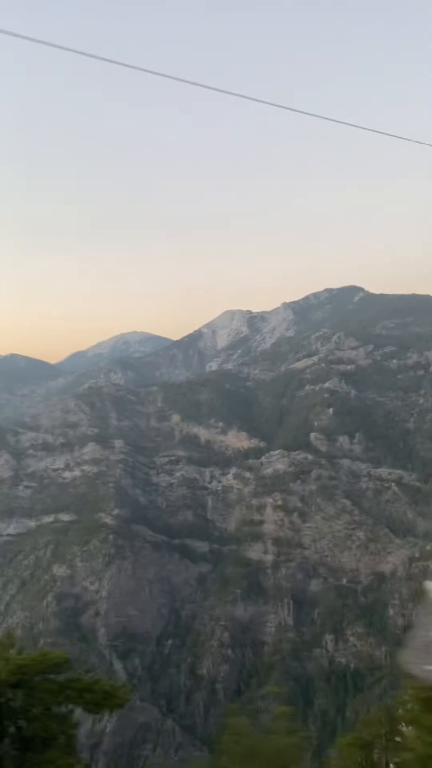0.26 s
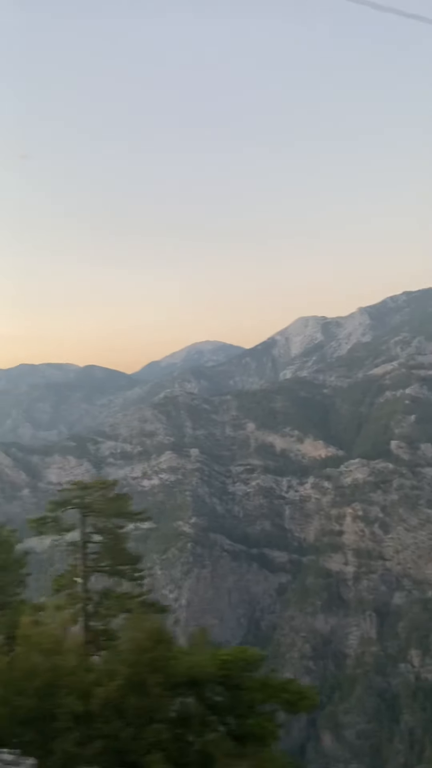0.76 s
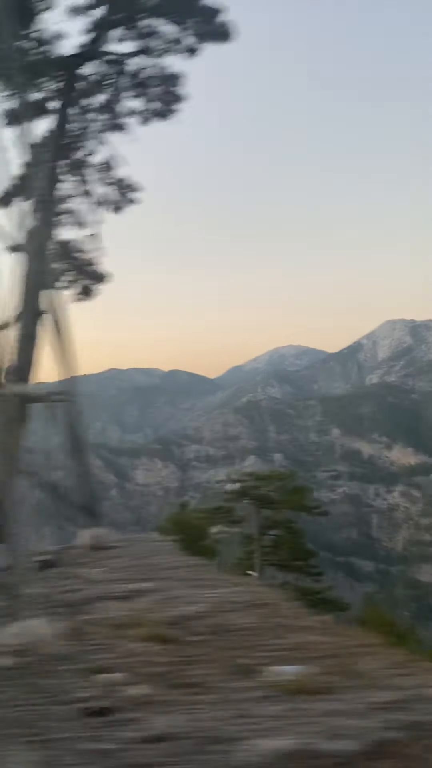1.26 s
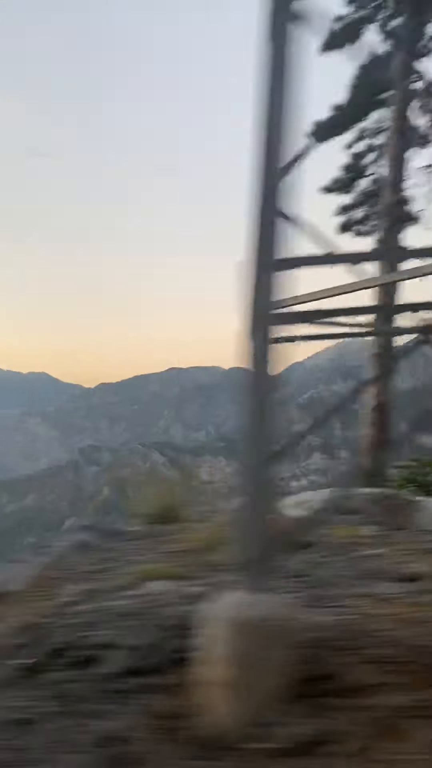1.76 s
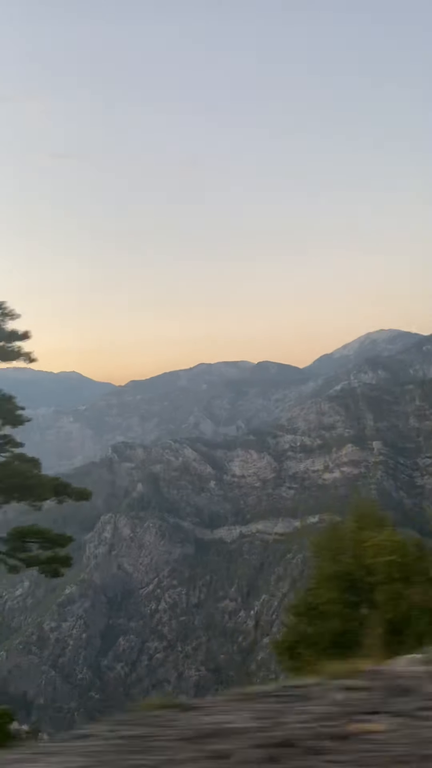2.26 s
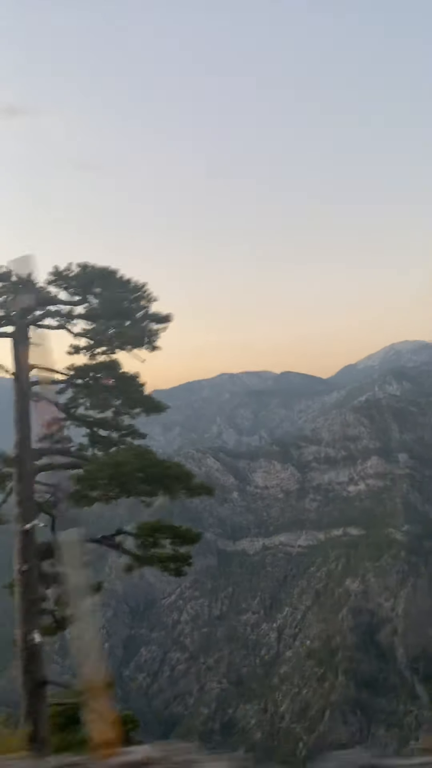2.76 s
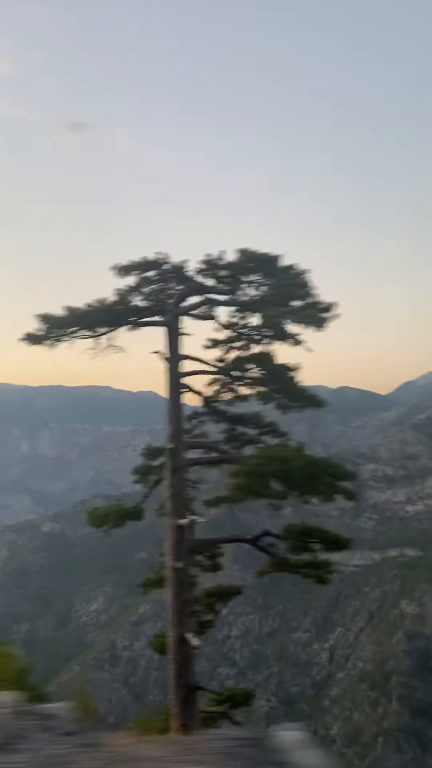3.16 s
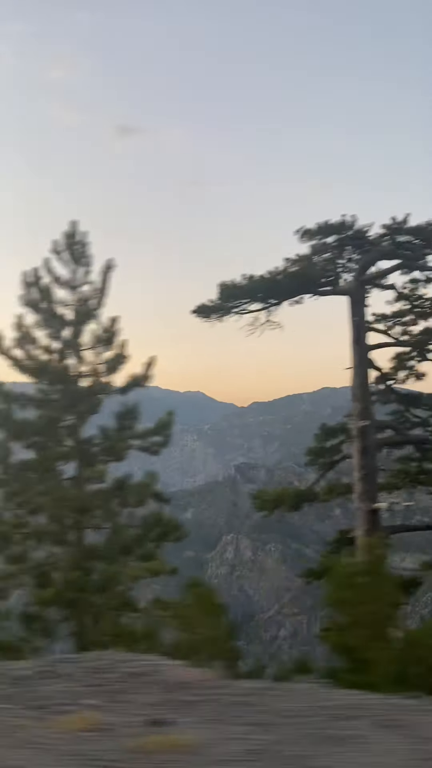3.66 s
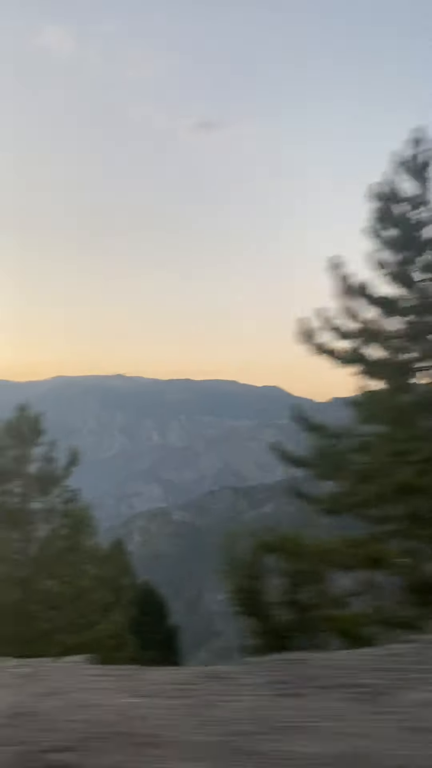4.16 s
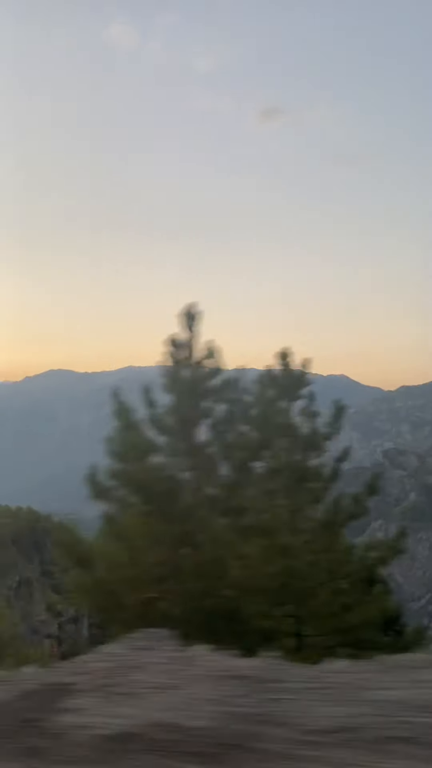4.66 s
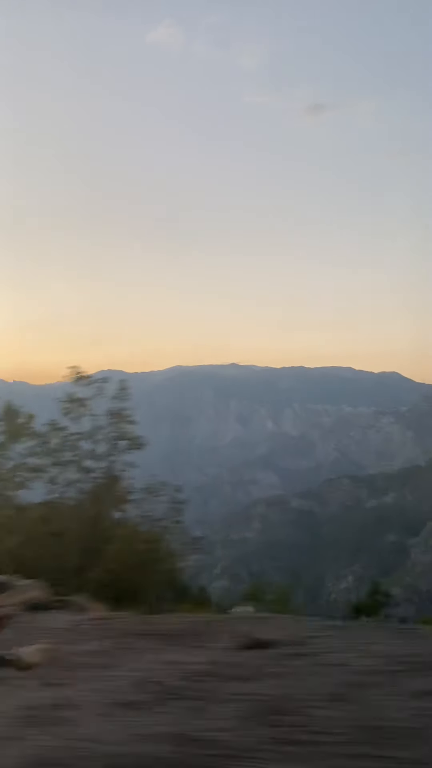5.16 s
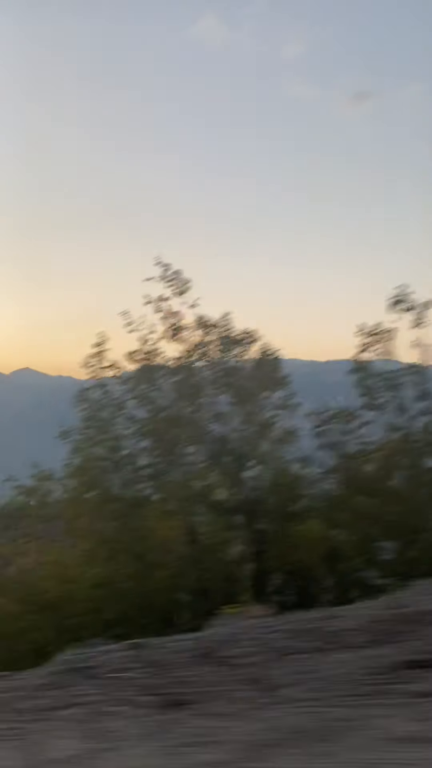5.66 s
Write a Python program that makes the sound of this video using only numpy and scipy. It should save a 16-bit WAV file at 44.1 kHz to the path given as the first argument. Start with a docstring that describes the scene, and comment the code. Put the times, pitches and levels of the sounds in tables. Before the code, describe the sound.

Close, rough sound from inside a moving car. Irregular wind gusts batter and overload the microphone at the start, pushing the cabin air into deep thuds. The blows become sparser, revealing steady tyre roar, thin hiss and a low, unsteady engine hum. Soft thuds gather later and heavy buffeting returns in the last moments.

```python
"""Inside a car on a mountain road, a phone is held at the open side window.
At first, eddies (short whirls of air) slap the microphone hard and thump the cabin air.
Then the blows ease; the engine drone comes up and the road booms twice through the rumble.
Towards the end the wind strikes hard again. All along, shaped noise makes the tyres roar and the air hiss."""
import sys
import numpy as np
from scipy import signal
from scipy.fft import rfft, irfft
from scipy.io import wavfile
from scipy.ndimage import uniform_filter1d, map_coordinates

SR = 44100
rng = np.random.default_rng(int(sys.argv[2]) if len(sys.argv) > 2 else 0)


def dump_mix(stems):
    """Bounce the given channels to the path in sys.argv[1] as a 16-bit WAV at rate SR."""
    frames = np.atleast_2d(stems).T  # one column per channel
    limited = np.clip(frames, -1, 1)  # hard clip at full scale
    pcm = np.round(limited * 32767).astype(np.int16)
    wavfile.write(sys.argv[1], SR, pcm)


N = 260190
TIME = np.arange(N) / SR  # seconds
FREQ = np.maximum(np.arange(N // 2 + 1) * SR / N, 1)  # Hz, kept above zero


def undb(db):
    """Decibels to gain."""
    return 10 ** (np.asarray(db) / 20)


def to_db(gain):
    """Gain to decibels."""
    return 20 * np.log10(gain)


def unit(x):
    """Scale to an rms (average strength) of 1."""
    return x / np.sqrt(np.mean(x ** 2))


def curves(table):
    """The columns of a time table, joined by straight lines to one value per sample."""
    s, *columns = np.transpose(table)
    return [np.interp(TIME, s, column) for column in columns]


def across(points):
    """(Hz, value) points joined on a log-frequency axis."""
    hz, value = np.transpose(points)
    return np.interp(np.log(FREQ), np.log(hz), value)


def walk(rate):
    """Smooth chance with an rms of 1 that changes about `rate` times a second."""
    return unit(irfft(rfft(rng.standard_normal(N)) / (1 + (FREQ / rate) ** 4), N))


def resonance(f, hz, damping):
    """A steep-sided band around one frequency; more damping makes it wider."""
    return 1 / (1 + ((f / hz - hz / f) / (2 * damping)) ** 2) ** 2


def lift(modes):
    """The dB that a set of resonances adds to a spectrum, or takes away where negative."""
    return sum(peak_db / (1 + (2 * (FREQ - hz) / width) ** 2) for hz, width, peak_db in modes)


def stereo_noise(db):
    """Noise of a given colour; the two ports hear much the same bass, and the treble a little apart in time."""
    # likeness of left and right: f/Hz, coherence (1 = the same)
    likeness = [(40, .99), (80, .96), (130, .83), (290, .6), (640, .5), (1300, .65), (1550, .2),
                (1850, .55), (2900, .42), (3600, .75), (4500, .55), (5200, .85), (7400, .85), (12000, .75)]
    # which port hears more: f/Hz, left minus right/dB
    balance_db = [(150, 0), (320, -2), (700, 0.5), (1080, 3), (1400, -0.5), (1800, -5), (2500, -3),
                  (3300, 0.5), (4700, -1.5), (5500, -1)]
    # the hiss comes from the window side, so the left port leads in the treble: f/Hz, phase lead/radians
    port_phase = [(500, 0), (680, .8), (1280, 1.2), (1520, 0), (3000, 0), (4500, 1.4), (4850, .2),
                  (5300, .2), (7400, 3.14), (10200, 6.28), (11600, 7), (13000, 9.42)]
    alike = np.clip(across(likeness), -.99, .99)
    mid = rfft(rng.standard_normal(N)) * undb(db) * np.sqrt(1 + alike)
    side = rfft(rng.standard_normal(N)) * undb(db) * np.sqrt(1 - alike)
    left = undb(across(balance_db) / 2) * np.exp(1j * across(port_phase) / 2)
    ports = irfft(np.array([(mid + side) * left, (mid - side) / left]), N)
    return ports / np.std(ports.mean(axis=0))


def wind(gust_db):
    """Eddies slap, snap and thump at the window, with a flutter of small random eddies between them."""
    # eddies that hit the microphone port:
    # t/s, level/dB (before the 3 dB lift below), half length/ms, middle of the spectrum/Hz
    slap_table = [(.019,-14.5,1.45,484), (.035,-16.5,1.9,333), (.048,-18.5,2.3,410), (.093,-25.5,2.3,432),
                  (.146,-15,2.7,656), (.226,-18,2.55,513), (.315,-25,1.3,350), (.34,-25,3,300),
                  (.364,-26,3.7,440), (.388,-22.5,2.4,287), (.402,-29,1.2,257), (.422,-24,2.2,462),
                  (.442,-15.5,2.5,422), (.456,-18.5,1.8,366), (.487,-24.5,1.8,288), (.551,-16.5,3.5,388),
                  (.562,-24,4.6,397), (.6,-24,13,260), (.677,-17,7.5,430), (.754,-15,3.8,512),
                  (.766,-18,5.7,523), (.776,-17,1.1,590), (.886,-20.5,2.8,633), (.897,-19.5,5.2,440),
                  (.93,-21.5,2.1,536), (.943,-20,4.9,400), (1.087,-17,5,450), (1.204,-21,6.4,324),
                  (1.25,-24,3.4,220), (1.275,-24,3.6,240), (1.319,-12,1.5,310), (1.321,-15,2.3,202),
                  (1.533,-19,3.4,378), (1.853,-21.5,7.7,286), (1.892,-19.5,4.7,247), (1.925,-25.5,3.7,295),
                  (2.077,-22.5,5.3,453), (2.168,-20.5,8.2,310), (2.196,-24,3,300), (2.255,-24,5.5,276),
                  (2.357,-24.5,1.6,313), (2.402,-23.5,4.3,190), (2.48,-25,2.7,257), (2.545,-24,1.1,280),
                  (2.563,-26,4,190), (2.643,-19,4.5,336), (2.762,-20.5,3,520), (2.771,-25.5,4.6,242),
                  (3.005,-23.5,5.6,270), (3.435,-20.5,2.7,260), (3.77,-19,3.5,290), (3.832,-22.5,4.7,265),
                  (4.483,-26,2,251), (4.818,-19,7.7,213), (4.838,-23,2.1,255), (5.37,-32,1.8,252),
                  (5.692,-20,2.3,220), (5.723,-17,2.3,190), (5.804,-15,1.4,325), (5.819,-18,5.2,300)]
    flutter_db, flutter_share = -30, .24  # dB at a 0 dB gust; dB of flutter per dB of gust
    slaps = undb(3.0) * eddies(slap_table, slap_colour, apart=.21, late=.6954, lumpy_db=3, attack=.84)
    bursts = undb(4 * walk(35))
    flutter_colour = slap_colour(FREQ, hz=234, low=1.0)
    flutter = unit(stereo_noise(to_db(flutter_colour)) * bursts)
    flutter = flutter * undb(flutter_db + flutter_share * gust_db)
    return slaps + snaps() + undb(-1.5) * thumps() + flutter


def eddies(rows, colour, apart, late, lumpy_db, attack, size=8192):
    """Each eddy is a short, lumpy swell of noise that rises faster than it falls, partly unlike at the ports."""
    out = np.zeros((2, N + 2 * size))
    t = (np.arange(size) - size // 2) / SR
    f = np.maximum(np.arange(size // 2 + 1) * SR / size, 1)
    for s, db, half_ms, hz in rows:
        lengths = 1000 * t / half_ms / np.where(t < 0, attack, 2 - attack)
        swell = np.exp(-lengths ** 2 / 4)
        lumps = undb(lumpy_db * unit(uniform_filter1d(rng.standard_normal(size), size=90)))
        # the eddy slows as it breaks up: each frequency comes `late` of its own cycles later
        glide = np.exp(-2j * np.pi * late * (np.log(f) - f / hz))
        noise = rng.standard_normal((2, size)) * swell * lumps
        mid, side = irfft(rfft(noise) * colour(f, hz) * glide)
        mid, side = unit(mid), apart * unit(side)
        burst = np.array([mid + side, mid - side]) * undb(db) * np.sqrt(np.mean(swell ** 2))
        start = int(np.clip(s, 0, N / SR) * SR) + size // 2
        out[:, start:start + size] += burst
    return out[:, size:size + N]


def slap_colour(f, hz, low=0.33, edge=1.37, slope=2.44, tilt=0.61, port_hz=980, leak=0.58):
    """Turbulence fills a band set by the eddy's speed; above it the port lets only a little treble through."""
    low_hz = low * hz * np.sqrt(hz / 320)  # small fast eddies carry the least bass
    bass_edge = 1 / np.sqrt(1 + (low_hz / f) ** 4)
    treble_edge = 1 / np.sqrt(1 + (f / (edge * hz)) ** (2 * slope))
    port = leak + 1 / np.sqrt(1 + (f / port_hz) ** 10)
    return f ** -tilt * bass_edge * treble_edge * port


def snaps(apart=0.38, size=4096):
    """The sharpest eddies overload the port: one kick of pressure, slightly out of step at the two ports."""
    # snaps: t/s, level/dB, middle of the spectrum/Hz, damping (0-1)
    snap_table = [(.0185,-7.5,650,0.7), (.03,-11.5,650,0.6), (.049,-9,620,0.4), (.146,-0.5,770,0.48),
                  (.2275,-9.5,590,0.63), (.315,-20.5,520,0.4), (.419,-18,600,0.5), (.4435,-8,590,.5),
                  (.549,-8,383,0.9), (.558,-13,362,.5), (.672,-11,700,0.7), (.753,-14,676,0.4),
                  (.764,-12,680,0.5), (.775,-15,1200,.85), (.681,-8.5,520,0.47), (.886,-13.5,720,.5),
                  (.898,-13,640,0.6), (.949,-9,430,.45), (1.085,-5,534,0.48), (1.209,-8.5,330,0.42),
                  (1.315,-6.5,565,0.53), (1.535,-10,420,0.6), (1.842,-9.5,380,.62), (2.075,-14,640,0.53),
                  (2.168,-12,338,0.64), (2.479,-15.5,340,0.56), (2.544,-17,477,0.4), (2.643,-15.5,745,0.46),
                  (2.762,-11,910,0.62), (3.432,-16.5,700,.6), (3.436,-10.5,258,0.66), (3.768,-17,484,0.9),
                  (4.483,-15,300,.6), (5.692,-12,330,0.4), (5.723,-8.5,300,0.57), (5.773,-20.5,1000,0.4),
                  (5.8025,-20.5,950,.35), (5.804,-6.5,300,.62)]
    out = np.zeros((2, N + size))
    f = np.maximum(np.arange(size // 2 + 1) * SR / size, 1)
    for s, db, hz, damping in snap_table:
        band = resonance(f, hz, damping)
        out_of_step = np.array([[apart], [-apart]]) * rng.choice([-1, 1])
        phase = 2 * np.pi * rng.random() + out_of_step
        kick = np.roll(irfft(band * np.exp(1j * phase)), size // 2, axis=1)
        kick = kick / irfft(band)[0]  # a kick with no phase turn would peak at 1
        start = int(np.clip(s, 0, N / SR) * SR)
        out[:, start:start + size] += undb(db) * kick
    return out[:, size // 2:size // 2 + N]


def thumps(attack=0.69, fall_octaves=.75, fall_s=.012, ragged=0.24, apart=0.078):
    """The cabin air takes a push and swings a few times, slowing down as it dies away."""
    # pushes after a slap or from an eddy that misses the port:
    # t/s, level/dB (before wind() takes off 1.5 dB), half length/ms, pitch at that time/Hz
    thump_table = [(.039,-13.5,5.4,110.3), (0.169,-10.5,7.7,72), (0.24,-8.5,4.1,81.1), (.332,-14.5,5,87),
                   (.439,-12,5.6,78.5), (.549,-12,5.8,98.1), (0.577,-14,5,72.2), (.647,-14,16,58.6),
                   (0.692,-13,8.7,94.8), (.785,-10.5,5.3,72.4), (.827,-14.5,9.9,61.9),
                   (0.904,-5.5,2.2,88.7), (.964,-8,5.5,79.2), (1.098,-10.5,7.6,84.2), (1.213,-16,10.6,70),
                   (1.271,-16,7.7,60.8), (1.326,-13.5,11.5,109.7), (1.6,-22,12,80), (1.852,-10,7.3,71),
                   (1.938,-18,4.2,85.1), (2.085,-18,17,69.4), (2.192,-17,6.2,75.9), (2.225,-17.5,7,84.5),
                   (2.264,-17,4,86.2), (2.499,-18,8.5,75.05), (2.652,-11.5,4.6,81.9), (2.785,-12,5.3,59.2),
                   (2.905,-20.5,6.6,96.1), (3.22,-16.5,4.4,115.8), (3.335,-19.5,19,79.6),
                   (3.444,-12.5,5.5,100), (3.782,-11,3.2,73.3), (3.807,-14.5,7.4,64.7),
                   (3.928,-18.5,10.6,70.4), (4.042,-12.5,5.3,77.2), (4.174,-15.5,6.5,84.1),
                   (4.361,-15,6,87.5), (4.406,-15,7.3,100.4), (4.549,-20,5,88.2), (4.595,-15.5,4,76.3),
                   (4.657,-16,10.3,107.3), (4.72,-20,6.6,66.9), (4.795,-8,7,80.6), (4.847,-16,8.2,93.4),
                   (4.907,-8.5,5.5,77), (4.987,-9,4.9,80.5), (5.314,-14.5,8.2,107.7), (5.371,-13,4.1,76.5),
                   (5.42,-13,4.2,98), (5.571,-11.5,7.6,77.5), (5.619,-9.5,5.6,70.2), (5.654,-9,4.9,61.6),
                   (5.711,-5,7.4,84.3), (5.738,-5,5.3,79.9), (5.81,-8,4,80.1), (5.833,-11,6.6,71.7),
                   (5.881,-12,11,61)]
    out = np.zeros((2, N))
    for s, db, half_ms, hz in thump_table:
        near = np.abs(TIME - s) < .12
        t = TIME[near] - s
        lengths = 1000 * t / half_ms
        rise = np.exp(-(lengths / attack) ** 2 / 4)
        fall = 1 / np.cosh(lengths / np.sqrt(2))
        swell = np.where(t < 0, rise, fall)
        pitch_hz = hz * 2 ** (-fall_octaves * np.tanh(t / fall_s))
        phase = 2 * np.pi * (np.cumsum(pitch_hz) / SR + rng.random())
        ports = np.array([[1], [-1]]) * apart * rng.standard_normal()
        out[:, near] += np.sqrt(2) * undb(db) * swell * np.sin(phase + ports)
    return out * (1 + ragged * walk(150))


def engine(wobble=0.0138, throb_db=3, port_shift=0.013):
    """The firing rate and its multiples drone through the body, a little unsteady, as the engine gains speed."""
    # engine load: t/s, level/dB
    load = [(0, -67), (1.4, -35), (2.2, -28.5), (2.9, -32.5), (4.3, -26.5), (5, -23), (5.9, -24.5)]
    # engine orders: multiple of the firing rate, level relative to the other orders/dB
    orders_db = [(1, -1), (1.5, -35), (2, -9), (3.5, -16.5), (4, -14.5)]
    firing_hz, rise_hz_per_s = 78.96, 1.3
    db, = curves(load)
    hz = firing_hz + rise_hz_per_s * TIME
    phase = 2 * np.pi * np.cumsum(hz * (1 + wobble * walk(5.43))) / SR
    phase = phase + np.array([[port_shift], [-port_shift]])  # standing waves meet the ports out of step
    drone = 0
    for multiple, order_db in orders_db:
        throb = undb(order_db + throb_db * walk(3.2))
        drone = drone + throb * np.sin(multiple * phase + rng.uniform(0, 2 * np.pi))
    return unit(drone) * undb(db)


def road(gust_db, boom_hz=148, damping=0.2, hum_hz=305, hum_damping=0.33):
    """Rough asphalt shakes the body and rings two resonances of the cabin air; the rumble swells with the gusts."""
    # colour of the rumble: f/Hz, relative level/dB
    rumble_colour = [(18, -34), (30, -11), (45, 5), (85, 2), (115, -0.5), (160, -5.5), (210, -9.5),
                     (330, -11), (500, -72), (900, -88)]
    # the cabin booms on a coarser stretch of asphalt: t/s, middle level/dB
    boom_table = [(0, -51), (2.2, -41.5), (2.5, -28.5), (2.9, -37.5), (3.85, -40.5), (4.15, -25),
                  (5.05, -34), (5.9, -32)]
    # the upper cabin resonance, whose hum grows in the second half: t/s, middle level/dB
    hum_table = [(0, -37), (1.4, -39), (2.9, -38.5), (3.7, -36.5), (4.5, -36), (5.9, -35.5)]
    boom_db, = curves(boom_table)
    hum_db, = curves(hum_table)
    boom = stereo_noise(to_db(resonance(FREQ, boom_hz, damping))) * undb(boom_db + 2.1 * walk(9.4))
    hum = stereo_noise(to_db(resonance(FREQ, hum_hz, hum_damping))) * undb(hum_db + 1.5 * walk(13))
    rumble = stereo_noise(across(rumble_colour)) * undb(gust_db + 6.0 + 2.7 * walk(15.4))
    return rumble + boom + hum


def tyres():
    """The tread roars as noise shaped by a few resonances, wavering with the road surface."""
    # colour of the roar: f/Hz, relative level/dB
    roar_colour = [(150, 3.5), (260, 5), (420, 4), (600, -0.5), (780, -0.5), (1150, -0.5), (1450, -6),
                   (1850, -11), (2600, -14), (4000, -19), (7000, -28.5), (14000, -34.5)]
    # resonances that the tyres ring: f/Hz, width/Hz, lift/dB
    tyre_modes = [(627, 61, 4.5), (860, 23, 4), (1230, 53, 2.5), (1518, 50, 1.5), (1600, 52, -2),
                  (1844, 160, 3.5)]
    # the roar by road surface: t/s, middle level/dB
    roar_table = [(0, -35), (1.3, -34), (1.42, -33.5), (2.2, -35), (2.55, -36.5), (2.9, -36.5), (3.6, -36),
                  (4.3, -35.5), (5.9, -35)]
    db, = curves(roar_table)
    return stereo_noise(across(roar_colour) + lift(tyre_modes)) * undb(db + 0.75 * walk(28.0))


def airstream(flow_db, rush_hz=2050, damping=0.53):
    """Air hisses past the window frame; gusts add a lower, grainy rush."""
    # colour of the hiss: f/Hz, relative level/dB
    hiss_colour = [(1200, -12), (2800, -.3), (3500, -2.5), (4000, -1), (4500, -.5), (5600, 1), (6400, .3),
                   (7500, -3), (8200, -4.5), (9500, -7.5), (12500, -10.5)]
    # resonances of the window gap: f/Hz, width/Hz, lift/dB
    gap_modes = [(2730, 220, 2.5), (3450, 200, -2.5), (3950, 250, 2.5), (4810, 130, 4.5), (5380, 260, 3)]
    # gusts rushing over the edge of the window: t/s, level/dB
    rush_table = [(0, -52), (1.2, -51), (1.5, -70), (2.15, -52), (2.5, -57), (3.4, -71), (3.95, -54),
                  (4.3, -58), (4.85, -46), (5.2, -58), (5.7, -48.5)]
    rush_db, = curves(rush_table)
    waver_db = .7 * walk(20)
    grain_db = 2.5 * walk(9) + 3 * walk(120)
    grainy = stereo_noise(to_db(resonance(FREQ, rush_hz, damping))) * undb(grain_db)
    rush = unit(grainy) * undb(rush_db)
    hiss = stereo_noise(across(hiss_colour) + lift(gap_modes)) * undb(flow_db - 1.5 + waver_db)
    return hiss + rush


def cabin(x, count=6, echo_db=-15.5, drift_s=.00025):
    """Door, roof and glass return short echoes, which drift as the hand moves."""
    lags = rng.uniform(.003, .022, count)  # seconds
    paths = [TIME - lag - drift_s * walk(.7) for lag in lags]
    ports = []
    for port in x:
        echoes = sum(map_coordinates(port, [path * SR], mode="wrap") for path in paths)
        ports.append(port + undb(echo_db) * echoes)
    return np.array(ports)


def suppressor(x):
    """Wind reduction: each band is turned down where its power falls far below its own running mean."""
    # bands: lower edge f/Hz, upper edge f/Hz, threshold against the running mean/dB
    bands = [(30, 210, -11.5), (172, 560, -10), (398, 1050, -11)]
    out = x
    for low_hz, high_hz, threshold_db in bands:
        band_filter = signal.butter(2, [low_hz, high_hz], "bandpass", fs=SR, output="sos")
        band = signal.sosfiltfilt(band_filter, x)
        power = np.mean(band ** 2, axis=0)
        now = uniform_filter1d(uniform_filter1d(power, size=800), size=400)
        threshold = uniform_filter1d(power, size=15000) * undb(threshold_db) ** 2
        out = out - band / (1 + (now / (threshold + 1e-12)) ** 2)
    return out


def scene():
    """Everything that reaches the window; one gust curve drives both the flutter and the rumble."""
    # strength of the gusts at the window, before each sound scales it: t/s, level/dB
    gust_table = [(0, -24), (.5, -33.5), (.7, -29), (1.25, -29.5), (1.45, -36.5), (1.8, -33.5),
                  (2.15, -34.5), (3.1, -38.5), (3.4, -31.5), (3.68, -38.5), (4.05, -32), (4.85, -29.5),
                  (5.2, -34), (5.55, -31.5), (5.72, -25), (5.9, -27)]
    # airflow past the window frame, before the hiss drops it by 1.5 dB: t/s, level/dB
    flow_table = [(0.06, -52.5), (1.62, -51.5), (3.15, -56.5), (3.34, -55), (4.73, -54), (4.89, -50.5),
                  (4.98, -54), (5.44, -54), (5.61, -50.5), (5.84, -52.5)]
    gust_db, = curves(gust_table)
    flow_db, = curves(flow_table)
    return wind(gust_db) + engine() + road(gust_db) + cabin(tyres() + airstream(flow_db))


def record(dry):
    """The phone sheds the deepest bass, tames the wind, rounds the highest peaks and cuts the top."""
    bass_cut = signal.butter(2, 24, "highpass", fs=SR, output="sos")
    lean = suppressor(signal.sosfilt(bass_cut, dry))
    rounded = lean / (1 + lean ** 6) ** (1 / 6)
    top_cut = signal.ellip(8, .2, 70, 12350, fs=SR, output="sos")  # little passes above 12350 Hz
    return signal.sosfilt(top_cut, rounded)


dry = scene()
out = record(dry)
dump_mix(out)
```